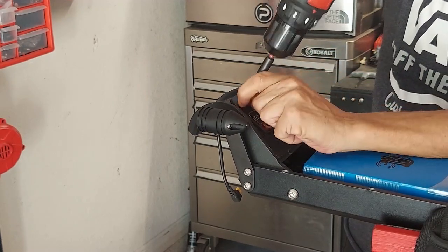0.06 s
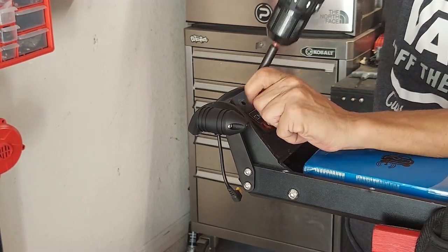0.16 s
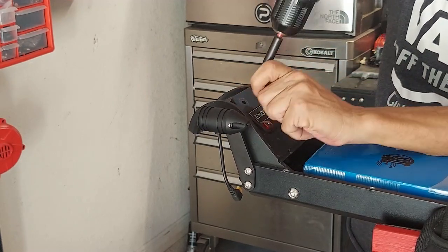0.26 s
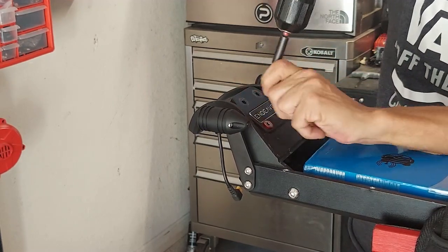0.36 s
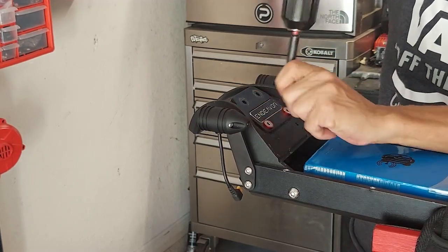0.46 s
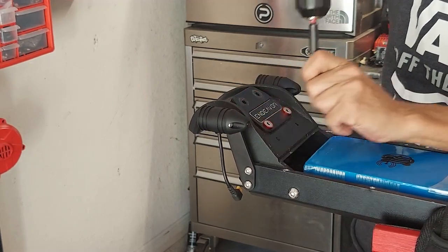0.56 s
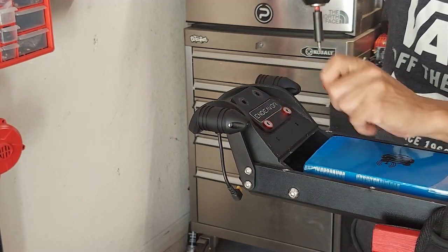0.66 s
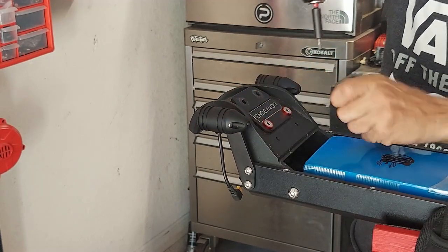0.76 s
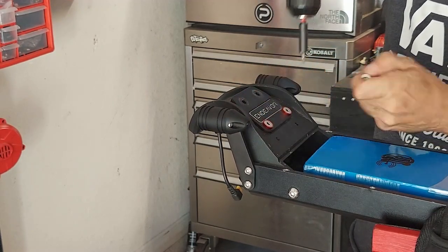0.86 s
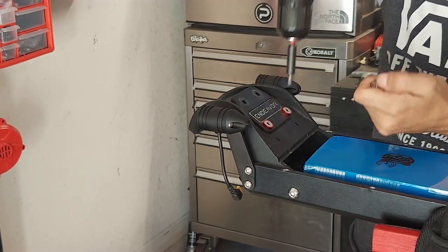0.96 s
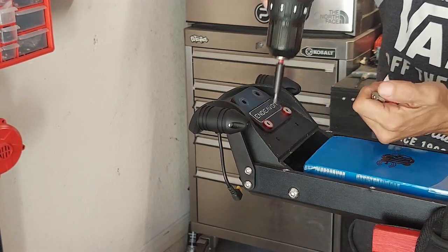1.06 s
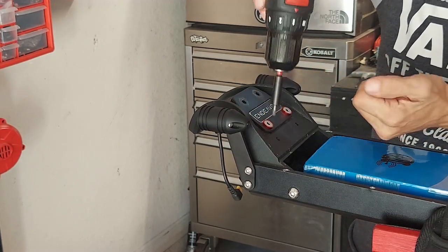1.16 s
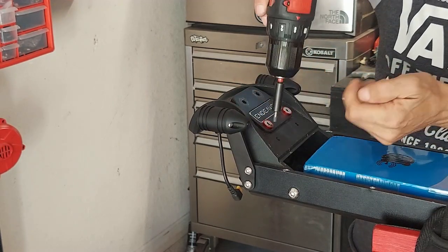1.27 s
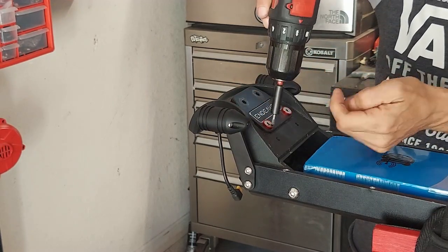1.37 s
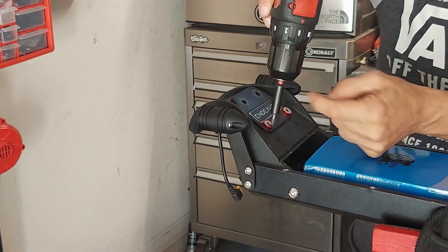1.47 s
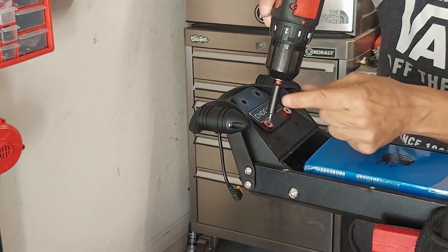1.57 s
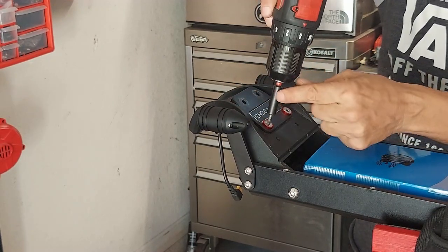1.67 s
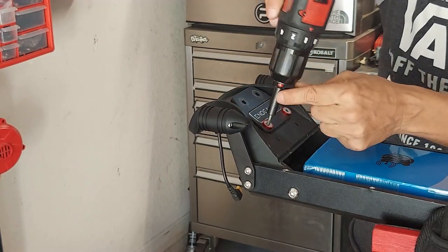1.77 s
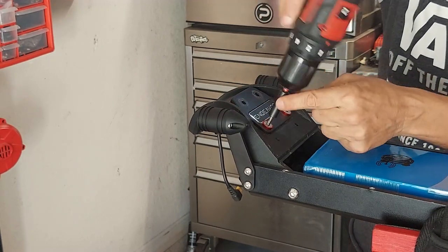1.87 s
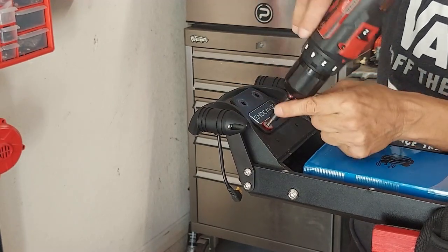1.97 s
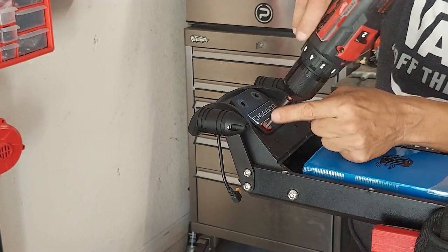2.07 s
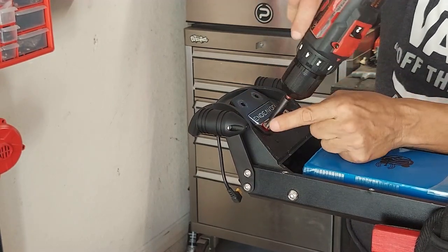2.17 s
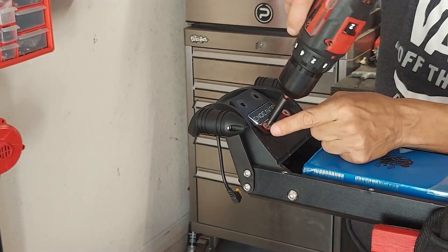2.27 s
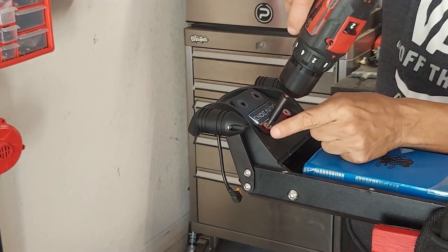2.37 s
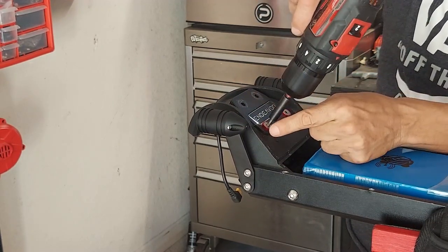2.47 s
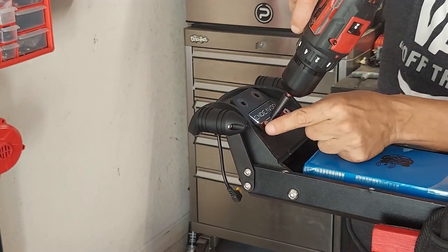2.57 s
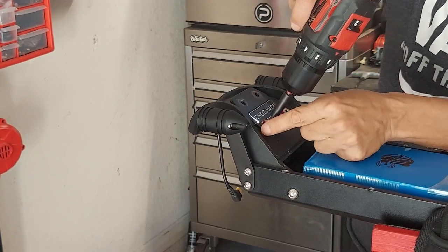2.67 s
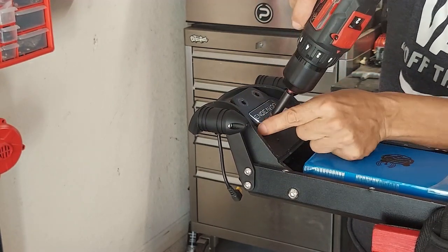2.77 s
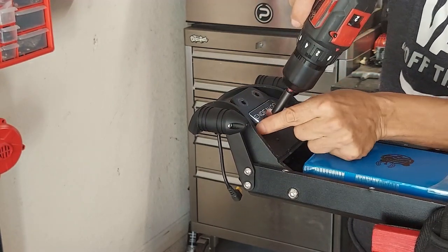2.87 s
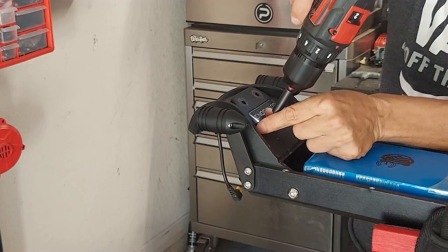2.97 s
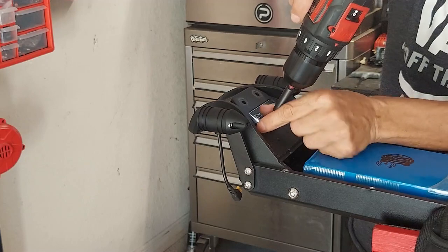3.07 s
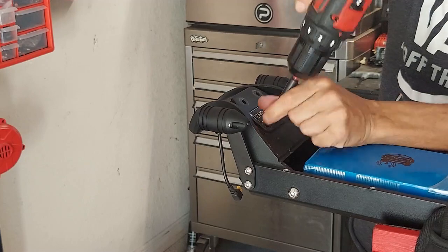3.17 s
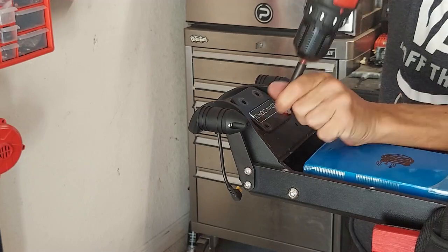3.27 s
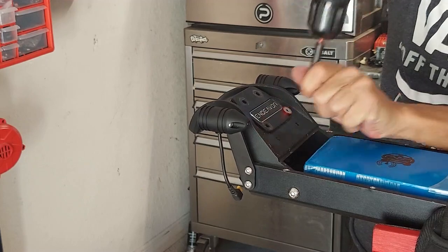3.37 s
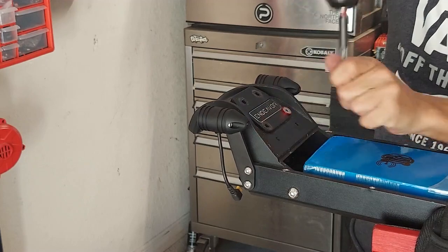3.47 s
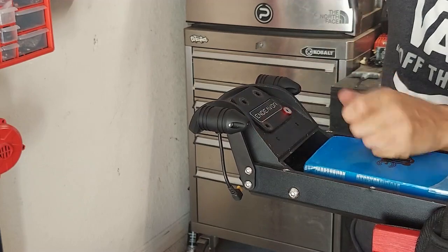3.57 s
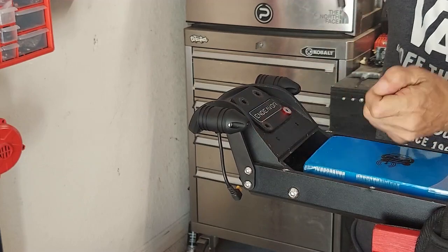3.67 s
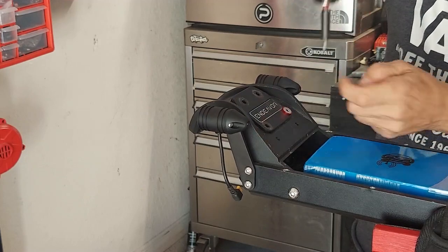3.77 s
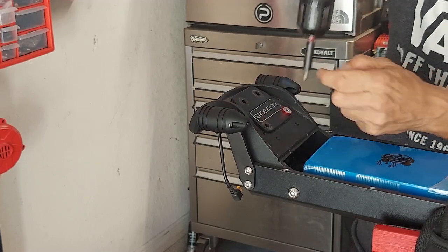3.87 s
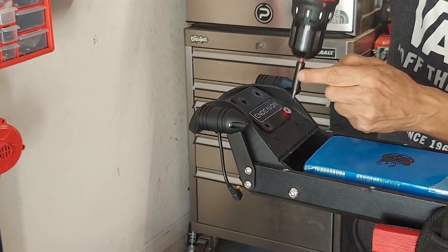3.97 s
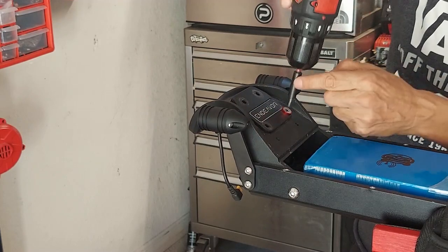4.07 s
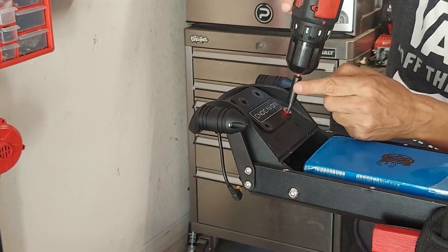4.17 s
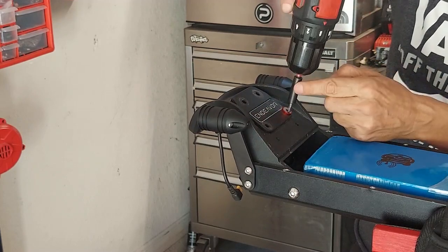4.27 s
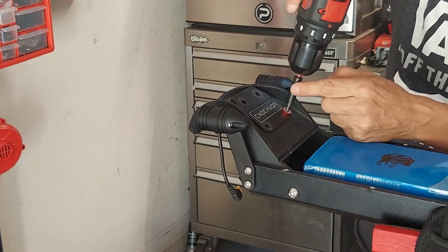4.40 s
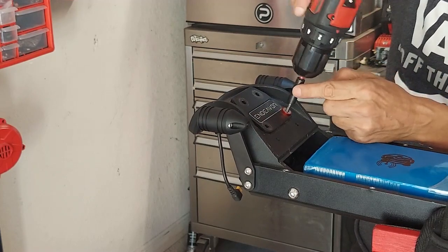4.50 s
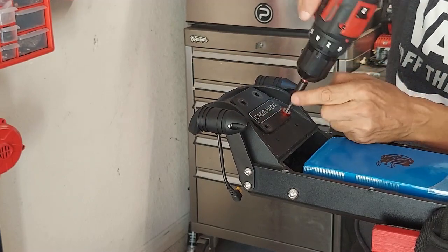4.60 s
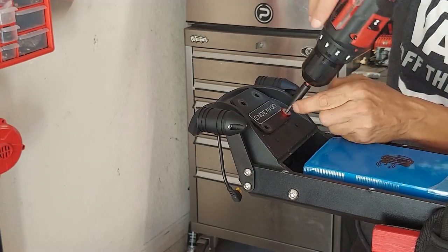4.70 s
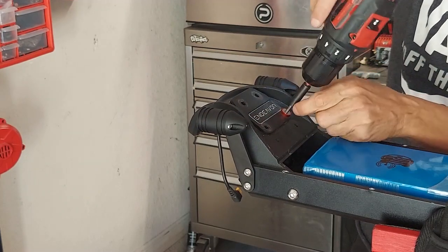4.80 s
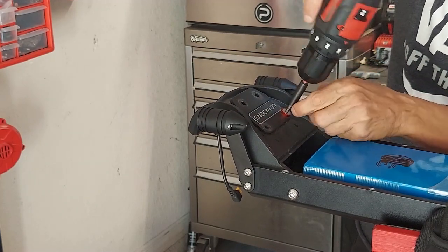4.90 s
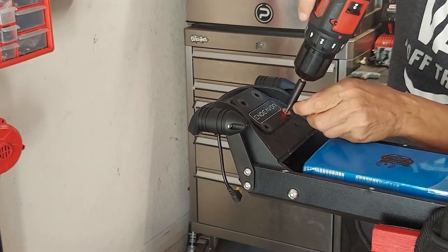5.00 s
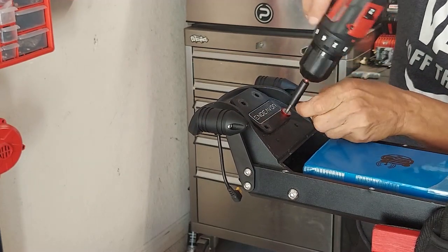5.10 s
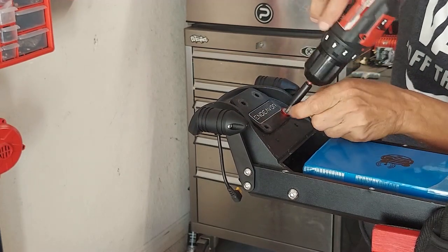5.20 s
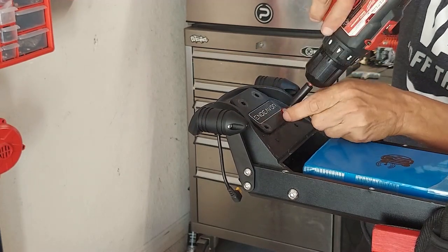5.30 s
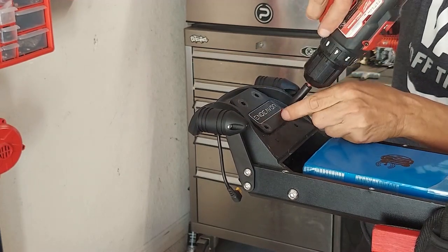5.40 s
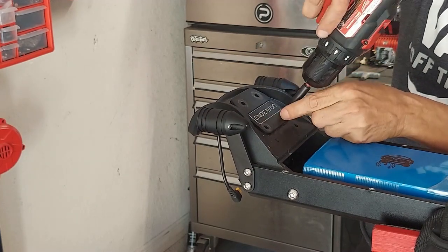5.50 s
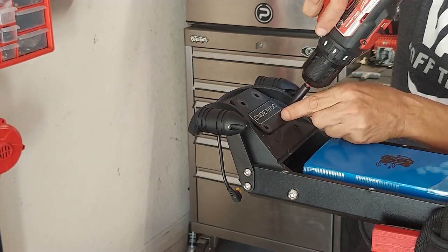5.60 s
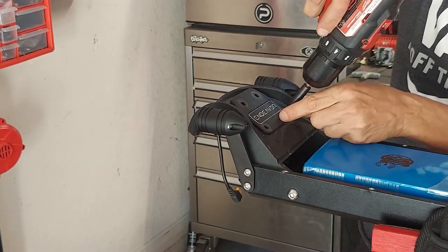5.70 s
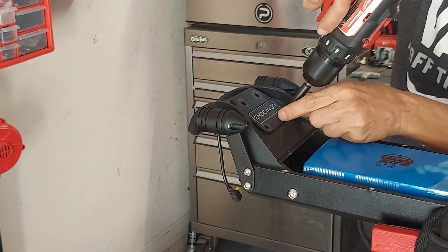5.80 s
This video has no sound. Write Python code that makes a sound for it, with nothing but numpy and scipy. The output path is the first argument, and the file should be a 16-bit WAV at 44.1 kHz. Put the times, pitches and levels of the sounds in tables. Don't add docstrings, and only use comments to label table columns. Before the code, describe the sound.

The fading tail of an earlier drill run gives way to light ticks and rubbing. Bit taps on a screw lead to a short buzzing motor burst with gear whine, ended by a bright crack and quick falling pitch. Afterwards come tiny screw rattles, faint scrapes and a hollow trigger clack. Hard garage walls echo everything over low distant traffic, heard nearby through one microphone, almost mono.

```python
import sys
import numpy as np
from scipy import signal
from scipy.fft import rfft, irfft
from scipy.io import wavfile
from scipy.ndimage import uniform_filter1d

SR = 44100
rng = np.random.default_rng(int(sys.argv[2]) if len(sys.argv) > 2 else 0)


def store_pcm(level_fs):
    pcm = np.round(np.clip(level_fs, -1, 1) * 32767).astype(np.int16)
    wavfile.write(sys.argv[1], SR, np.atleast_2d(pcm).T)


def volts_from_db(level):
    exponent = np.asarray(level, float) / 20
    return 10 ** exponent


N = 257835
T = np.arange(N) / SR


def level(x, db):
    return x * volts_from_db(db) / np.sqrt(np.mean(x ** 2))


def band(x, hz, octaves):
    edges = [hz * 2 ** (-octaves / 2), min(hz * 2 ** (octaves / 2), .45 * SR)]
    return signal.sosfilt(signal.butter(2, edges, "band", fs=SR, output="sos"), x)


def shape_db(hz, points, modes=()):
    f, db = np.transpose(points)
    humps = sum(d / (1 + (2 * (hz - c) / w) ** 2) for c, w, d in modes)
    return np.interp(np.log(hz + 1), np.log(f), db) + humps


def coloured(points, modes=()):
    hz = np.arange(N // 2 + 1) * SR / N
    spectrum = rfft(rng.standard_normal(N)) * volts_from_db(shape_db(hz, points, modes))
    return level(irfft(spectrum, N), 0)


def walk(rate):
    k = int(SR / rate)
    steps = np.repeat(rng.standard_normal(N // k + 1), k)
    return 1.3 * uniform_filter1d(uniform_filter1d(steps, k), k)[:N]


def add(out, s, x):
    i = int(s * SR)
    out[i:i + len(x)] += x[:N - i]


def fade(t, t60):
    return np.exp(-np.log(1000) * t / t60)


# f/Hz, level/dB per Hz
AIR = [(13, -73.5), (22, -45.5), (58, -8.5), (76, -5.5), (125, -9), (143, -17.5), (169, -8), (223, -11),
       (376, -14.5), (444, -17), (482, -17), (861, -19), (3060, -32), (12100, -39), (16000, -45)]
# t/s, half length/s, level/dB
TRAFFIC = [(0., .07, -40), (.62, .45, -46), (2.1, .3, -58), (2.46, .12, -54), (2.9, .2, -53),
           (3.23, .08, -53), (3.63, .1, -56), (4.15, .2, -60), (5.1, .2, -62), (5.58, .06, -53),
           (5.8, .15, -52)]
# start t/s, end t/s, f/Hz, level/dB
DRONES = [(3.3, 4.35, 174, -60), (4.9, 5.45, 385, -66), (0., 5.85, 12050, -83)]
# f/Hz, level/dB per Hz
SHELL = [(70, -52.5), (130, -31.5), (300, -21), (500, -16.5), (800, -7.5), (1300, -9.5), (2200, -9),
         (3200, -6), (5000, -7.5), (6000, -12.5), (9000, -19), (10500, -17), (13000, -19.5), (16000, -38)]
# f/Hz, width/Hz, level/dB
SHELL_MODES = [(332, 47, 7), (630, 90, 6.5), (1180, 170, 1.5), (1743, 420, 5.5), (2640, 260, 4.5),
               (3650, 250, 4), (4400, 500, 2.5), (7000, 600, 4), (10010, 280, 5), (11200, 420, 1),
               (13000, 470, 3.5)]


def background():
    out = level(coloured(AIR), -56) * volts_from_db(1.0 * walk(1.1))
    swell = volts_from_db(-70) + sum(volts_from_db(db) * np.exp(-((T - s) / half) ** 2) for s, half, db in TRAFFIC)
    out += swell * level(band(rng.standard_normal(N), 76, 0.31), -3.4)
    upper_swell = volts_from_db(-60) * (swell / volts_from_db(-55)) ** .35
    out += upper_swell * level(band(rng.standard_normal(N), 119.7, 0.12), -5.0)
    for start, end, hz, db in DRONES:
        gate = np.clip(np.minimum(T - start, end - T) / 0.04 + 0.16, 0, 1)
        out += volts_from_db(db + 3.4 * walk(26)) * gate * np.sin(2 * np.pi * hz * T + 0.54 * walk(9.4))
    last_run = band(coloured(SHELL, SHELL_MODES), 1700, 4.6) * volts_from_db(-46.5 - 60 * T / 0.45)
    return out + last_run


def hits(table, thud_db, t60_s, thud_loss, ring_gain, centres_hz, octaves, modes=(), modes_db=0):
    out, far, t = np.zeros(N), np.zeros(N), T[:SR // 10]
    click = 1. * (t == 0)
    for s, db, hz, high_db in table:
        low_db = thud_db - thud_loss * (db + 35)
        low_db -= 5 * np.log2(hz / centres_hz[1])
        fall = fade(t, np.clip(t60_s * volts_from_db(ring_gain * (db + 35)), .004, .2))
        crack, edge = 0, 0
        for sign, d, c in zip((-1, 1, -1), (low_db, -3.0, high_db), centres_hz):
            burst = (rng.standard_normal(len(t)) + 8 * click) * fall
            part = band(burst, c, octaves)
            gain = volts_from_db(d) / np.abs(part).max()
            crack = crack + gain * part
            edge = edge + sign * gain * np.linalg.norm(part) * band(click, c, octaves) / np.sqrt(c / SR)
        crack += volts_from_db(-11) * np.sin(2 * np.pi * hz * t) * fall
        for f, d, ring in modes:
            gain = volts_from_db(d + modes_db + low_db * (f < 900) + 2 * rng.standard_normal())
            crack += gain * np.sin(2 * np.pi * f * t) * fade(t, ring) * np.minimum(t / .0008, 1)
        add(out, s, volts_from_db(db) * crack)
        add(far, s, volts_from_db(db) * (.7 * edge + .3 * crack))
    return out, far


STEEL = dict(thud_db=-11, t60_s=.014, thud_loss=.45, ring_gain=-.05,
             centres_hz=(1500, 4600, 10000), octaves=1.23)
# t/s, peak level/dB, ring f/Hz, brightness/dB
TICKS = [(0.0522, -42, 4980, -28), (0.1083, -23, 7500, -6), (0.2033, -11, 6200, -1),
         (0.2933, -38, 2930, -1), (0.3548, -38, 3900, -30), (0.647, -33.5, 2570, -5),
         (0.6699, -36, 2540, 3), (0.6974, -44, 2730, 6), (0.7084, -43, 3780, -6),
         (1.1155, -37, 2770, -10.5), (1.152, -26.5, 6300, -11), (1.5504, -46, 7050, -21),
         (2.2833, -46, 3400, -20), (2.306, -45, 4200, -8), (2.3631, -30, 3660, -3), (1.801, -44, 5200, -12),
         (2.2955, -38, 4000, -12.5), (3.0295, -1.5, 4330, -13), (3.0315, -.5, 5300, -11),
         (3.5452, -41, 4120, 6.5), (3.6042, -41.5, 4600, -26), (5.0055, -28.5, 7040, -27),
         (5.0662, -25, 2600, -25), (4.2825, -41, 5300, -14), (4.432, -46, 5300, -20),
         (4.744, -47, 3200, -20), (4.773, -47, 3000, -20), (4.4555, -42, 3700, -16),
         (5.5308, -49, 3190, -15.5), (5.8363, -31, 1250, -16)]


def ticks():
    return hits(TICKS, **STEEL)


# f/Hz, t60/s, level/dB
GARAGE = [(250, 0.37, 4), (495, 0.44, 3), (1000, 0.69, -2.5), (2000, 0.39, -2), (4000, 0.46, 0),
          (8000, 0.48, -8.5), (13000, .4, -13.5)]


def garage(x):
    t, tail = T[:SR], np.zeros(SR)
    for hz, t60, db in GARAGE:
        octave = band(rng.standard_normal(SR), hz, 1.09)
        tail += level(octave, db + 10 * np.log10(hz / 8000)) * fade(t, t60)
    tail *= np.clip((t - .004) / 0.0041, 0, 1) / np.sqrt(0.055 * SR)
    return signal.fftconvolve(x, tail)[:N]


# t/s, length/s,
# level/dB, centre f/Hz, width/octaves
SCRAPES = [(0.074, 0.049, -52, 1080, 0.52), (0.231, 0.053, -55, 1310, 0.57),
           (0.512, .06, -59.5, 1420, 0.43), (0.649, 0.064, -61, 1420, 0.66), (1.392, 0.018, -53, 6300, 0.8),
           (1.856, .11, -56.5, 1300, 1.03), (2.275, .06, -61, 3600, .7), (3.179, 0.029, -30.5, 1325, 3.2),
           (3.244, .013, -37, 3828, 1.4), (3.246, .011, -47, 10500, .6), (3.669, 0.076, -62, 4460, 2.1),
           (3.763, 0.14, -59.5, 4800, 2), (4.264, 0.028, -56, 1000, 1.1), (4.41, 0.075, -61, 3450, .3),
           (4.425, .06, -63, 5300, .3), (4.278, .035, -61, 3600, .25), (3.2, .065, -43, 6200, .7),
           (4.442, 0.034, -58, 770, 2.2), (4.705, 0.034, -56, 6400, 1.6), (5.005, 0.042, -57, 7000, 0.36),
           (5.122, 0.044, -59, 6030, 0.75), (5.595, .12, -50, 3700, .3), (5.826, 0.02, -53, 4500, 1.6)]


def scrapes():
    out = np.zeros(N)
    for s, length, db, hz, octaves in SCRAPES:
        n = int(length * SR)
        slips = rng.standard_normal(n) * volts_from_db(3.0 * rng.exponential(size=n))
        add(out, s, level(band(slips * np.hanning(n) ** .5, hz, octaves), db))
    return out


# t/s, peak level/dB, ring f/Hz, brightness/dB
KNOCKS = [(0.081, -34.5, 958, -14), (.2036, -39, 800, -25), (4.463, -43, 600, -30),
          (0.2424, -39.5, 1320, -28), (0.5177, -44.5, 1320, -19), (1.4252, -37, 1330, -20),
          (1.6142, -37, 670, -20), (1.8439, -33.5, 1590, -11), (2.0266, -42.5, 934, -21),
          (2.3337, -42, 1400, -40), (2.356, -27, 1120, -26), (3.1848, -19.5, 1790, -18),
          (4.2396, -46, 2980, -12), (4.2744, -46, 920, -10), (4.2822, -36, 907, -14),
          (4.4478, -42, 5300, -3), (4.4484, -41, 904, -10)]
# f/Hz, level/dB, t60/s
HOUSING = [(334, 0., .08), (600, -12, .04), (1300, -4, .035), (1906, 0., .02), (2186, -6, .025),
           (3000, -10, .015), (3714, -13, .02), (5290, -14, .012)]


def knocks():
    return hits(KNOCKS, thud_db=-9, t60_s=.024, thud_loss=.3, ring_gain=.03,
                centres_hz=(500, 1900, 6300), octaves=1.82, modes=HOUSING, modes_db=-12.5)


# t/s, level/dB, f/Hz, t60/s
JOLTS = [(.204, -50, 4300, 0.3), (.204, -46, 4130, .12), (2.33, -33, 1400, .05), (2.364, -25.5, 331, 0.18),
         (3.238, -31.5, 615, 0.12), (3.262, -35, 327, 0.13), (4.279, -50, 5300, 0.06),
         (4.446, -52, 3650, .1), (3.18, -21, 1900, .06), (3.243, -38, 11500, .06), (3.243, -30, 3620, .05),
         (2.344, -45, 3800, .04), (2.472, -27, 3600, .06)]


def jolts():
    out, t = np.zeros(N), T[:SR // 5]
    for s, db, hz, t60 in JOLTS:
        add(out, s, volts_from_db(db) * np.sin(2 * np.pi * hz * t) * fade(t, t60) * np.minimum(t / .006, 1))
    return out


# t/s, peak level/dB, ring f/Hz, brightness/dB
RATTLE = [(1.382, -28, 4060, -5), (1.385, -43, 4400, -23), (1.3895, -30, 4300, -23),
          (1.3945, -33, 6230, -18), (1.3995, -30, 6660, -12), (1.407, -36, 6800, -20),
          (1.943, -45, 3190, -22), (3.6754, -42, 3100, -17), (3.6807, -30, 3080, -7),
          (3.704, -39, 7120, -19), (3.7187, -34, 6160, -23), (3.773, -36, 4180, -17),
          (3.782, -31, 4190, -21), (3.7884, -32, 2630, -9), (3.7976, -30, 8100, -12),
          (3.8122, -33, 4260, -10), (3.8182, -27.5, 7820, -8), (3.832, -25, 2500, 0),
          (3.8487, -24.5, 2700, 3), (3.9418, -31, 8400, 1), (3.9522, -36, 7020, -19),
          (4.6278, -35, 2900, -16), (4.6635, -42, 2900, -24), (4.6775, -38, 6500, -18),
          (4.695, -28.5, 6800, -17), (4.7115, -26, 6800, -8), (4.7167, -25, 8000, -8),
          (4.723, -29.5, 4300, -10), (4.8373, -44, 3860, -15), (5.1548, -37, 5400, -2)]


def rattle():
    return hits(RATTLE, thud_db=-19, t60_s=.008, thud_loss=.8, ring_gain=.1,
                centres_hz=(1700, 4800, 10500), octaves=1.23)


# t/s, peak level/dB, ring f/Hz, brightness/dB
TAPS = [
    (1.425, -27.5, 7200, -18),
    (1.433, -45, 7100, -8),
    (1.6135, -31.5, 6590, -20),
    (1.628, -52, 5200, -20),
    (1.6775, -42, 6500, -6),
    (1.7008, -48, 6600, -12),
    (1.709, -54, 5300, -14),
]
# f/Hz, level/dB, t60/s
BIT = [(668, 1, .05), (1335, -12, .04), (2250, -7, .018), (3300, -2, .016), (3480, 1, .022),
       (4100, -11, .015), (5010, -4, .014), (5233, -2, .017), (5500, -1, .014)]


def taps():
    return hits(TAPS, **STEEL, modes=BIT, modes_db=-5.5)


# t/s, commutator f/Hz (3 per motor turn)
SPEED = [
    (2.345, 60),
    (2.389, 378),
    (2.445, 652),
    (2.475, 728),
    (2.512, 767),
    (2.56, 789),
    (2.734, 826),
    (2.822, 836.7),
    (3.14, 845),
]
# f/Hz, width/Hz, level/dB
HUM_MODES = [(731, 14, -10), (781, 26, 8), (799, 10, -7)]
# f/Hz, width/Hz, level/dB
WHINE_MODES = [(3835, 40, -13), (3945, 40, 6), (3975, 30, -8), (4100, 600, 8)]
FULL_HZ, BRAKE_S, STOP_S = 845, 3.181, 3.29


def motor(t):
    s, rate = np.transpose(SPEED)
    let_go = s[-1]
    coast_drop = 1200 * np.clip(t - let_go, 0, BRAKE_S - let_go)
    brake = np.exp(-np.maximum(t - BRAKE_S, 0) / .036)
    hz = uniform_filter1d((np.interp(t, s, rate) - coast_drop) * brake, size=200, mode="nearest")
    decades, flat = np.log10(hz / FULL_HZ), [(1, 0), (SR, 0)]
    ends_db = 20 * np.log10(np.clip(np.minimum((t - s[0]) / .03, (STOP_S - t) / .04), 1e-3, 1))
    surge_s = .011
    off_db = -7.5 * np.clip((t - let_go) / (BRAKE_S + 2 * surge_s - let_go), 0, 1) ** 2
    bite_db = 1 * np.exp(-((t - 2.6) / .2) ** 2)
    surge_db = 9 * np.exp(-((t - BRAKE_S - surge_s / 2) / surge_s) ** 2)
    hiss_db = -24.4 + 13 * decades + bite_db + off_db + ends_db
    hum_db = -33 + 45 * decades + shape_db(hz, flat, HUM_MODES) * (t < let_go) + surge_db + ends_db
    whine_db = -35 + 75 * decades + shape_db(5 * hz, flat, WHINE_MODES) + 2 * off_db + ends_db
    return hz, hiss_db, hum_db, whine_db


# multiple of the motor turn, rms level/dB at full speed, gain/dB per percent slower
ORDER = [(1, -49, 0), (4, -46, 0), (5, -47, 0), (6, -45, 0), (6.3, -48, 0), (7, -51, 1.1), (9, -40, -.5),
         (9.5, -47, 0), (13, -39, -.4), (14, -47, 0), (16, -44, 0), (18, -41, .7), (24, -38.5, .3),
         (21, -47, .5), (25, -46, .5), (27, -44, -.3), (30, -45, .2), (33, -54, 0), (36, -39.5, -4),
         (40.2, -52, 0), (41.3, -51, 0), (42, -50, 1.1), (43.3, -50, 0), (45, -49, .3)]


def drill():
    on = (T > 2.345) & (T < STOP_S)
    hz, hiss_db, hum_db, whine_db = motor(T[on])
    turn = 2 * np.pi * np.cumsum(hz / 3) / SR
    tones = volts_from_db(hum_db + 1.6 * walk(40)[on]) * np.sin(3 * turn + .2 * walk(50)[on])
    tones += volts_from_db(whine_db + 2.2 * walk(60)[on]) * np.sin(15 * turn + .3 * walk(60)[on])
    change = uniform_filter1d(np.abs(np.gradient(hz)) * SR / 5000, 400)
    load = np.clip(change, 0, 1) ** 2.5
    gear_mesh = (10.2, -42.5 + 13.5 * load, .8 * (1 - load ** .2))
    smear_db = -14 * load ** .4
    slower = np.clip(100 * (1 - hz / FULL_HZ), 0, 8) * (T[on] < BRAKE_S)
    for k, db, slope in ORDER + [gear_mesh]:
        full_speed_db = shape_db(k * hz.max() / 3, SHELL, SHELL_MODES)
        swell = shape_db(k * hz / 3, SHELL, SHELL_MODES) - full_speed_db
        order_db = db + slope * slower + np.minimum(.9 * swell, 3) + hiss_db + 24
        order_db = order_db + 2.8 * walk(30)[on] + smear_db * (k > 11)
        tones += volts_from_db(order_db) * np.sin(k * turn + .5 * walk(30)[on])
    teeth = 1 + 0.13 * np.sin(turn) + 0.27 * np.sin(3 * turn)
    grain = volts_from_db(1.1 * walk(700) + 0.605 * walk(31.05))[on]
    whines, hiss = np.zeros(N), np.zeros(N)
    whines[on] = np.sqrt(2) * tones
    hiss[on] = volts_from_db(hiss_db - 2.0) * coloured(SHELL, SHELL_MODES)[on] * teeth * grain
    return whines, hiss


# t/s, peak level/dB, ring f/Hz, brightness/dB
CLUNK = [(5.5922, -19, 1400, -12)]
# f/Hz, level/dB, t60/s
LATCH = [(334, 7, .11), (600, -2, .12), (818, -1, .08), (1150, -4, .05), (1330, 2, .045), (1560, 0., .035),
         (1906, -2, .045), (2234, 1, .035), (2560, -8, .025), (3000, -3, .022), (3704, -10, .025),
         (4290, -14, .02), (5290, -6, .02), (6525, -18, .02)]
# f/Hz, level/dB
CLUNK_FAR = [(200, 5), (700, 4), (1100, 4), (1600, 6), (2300, 6), (3000, 1), (3700, 1.5), (16000, 0.)]


def clunk():
    near, far = hits(CLUNK, thud_db=-11, t60_s=.06, thud_loss=0, ring_gain=0,
                     centres_hz=(450, 1450, 4300), octaves=1.45, modes=LATCH, modes_db=2.5)
    far_db = shape_db(np.linspace(0, SR / 2, 257), CLUNK_FAR)
    fir = signal.firwin2(511, np.linspace(0, 1, 257), volts_from_db(2 * far_db))
    return near, signal.lfilter(signal.minimum_phase(fir), 1, far)


def scene():
    tick, tick_far = ticks()
    rub = scrapes()
    knock, knock_far = knocks()
    screws, screws_far = rattle()
    tap, tap_far = taps()
    whines, hiss = drill()
    tones = whines + jolts()
    clack, clack_far = clunk()
    to_walls = volts_from_db(-13) * (hiss + .4 * tones)
    to_walls += volts_from_db(-14) * (tick_far + screws_far + rub + volts_from_db(8) * tap_far)
    to_walls += volts_from_db(-4) * knock_far + volts_from_db(-1.6) * clack_far
    mono = background() + tick + rub + knock + screws + tap + tones + hiss + clack + garage(to_walls)
    return np.array([mono, mono])


def band_limit(x):
    return signal.sosfilt(signal.butter(12, 16550, fs=SR, output="sos"), x)


def record(dry):
    dry = signal.sosfilt(signal.butter(2, 35, "high", fs=SR, output="sos"), dry)
    low_pass = signal.ellip(8, .2, 50, 15750, fs=SR, output="sos")
    dry = volts_from_db(-39) * dry + signal.sosfilt(low_pass, dry)
    side = band(band(dry[0], 11000, 1.6) * walk(900), 11000, 1.6) * volts_from_db(-19.5)
    return band_limit(dry + np.array([side, -side]))


dry = scene()
out = record(dry)
store_pcm(out)
```